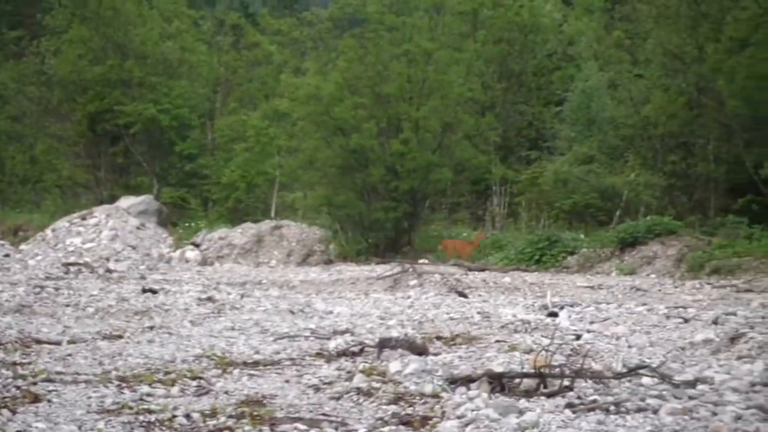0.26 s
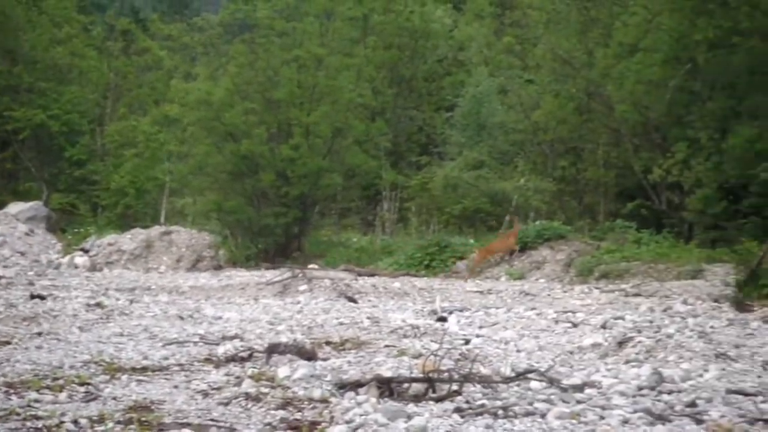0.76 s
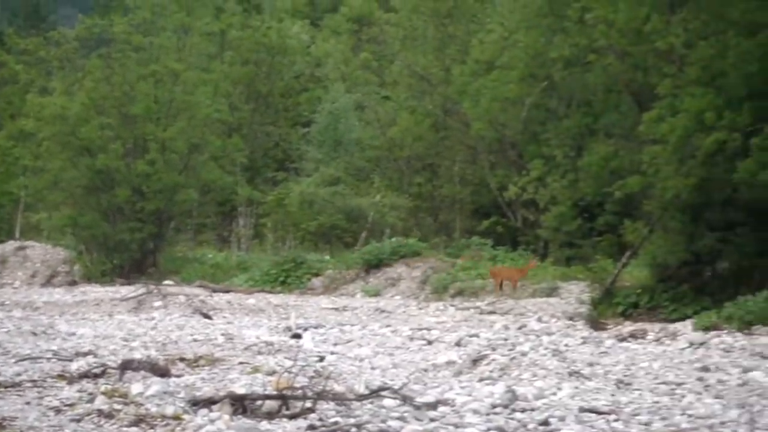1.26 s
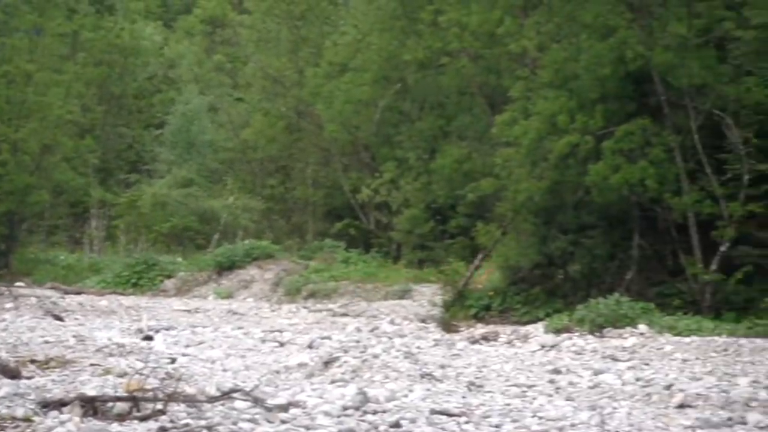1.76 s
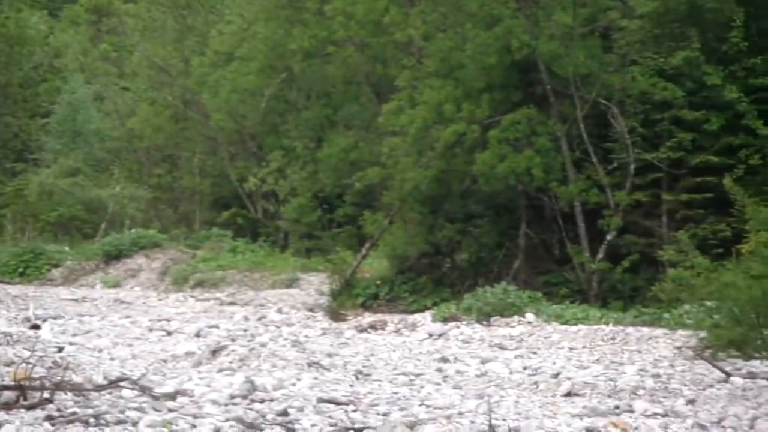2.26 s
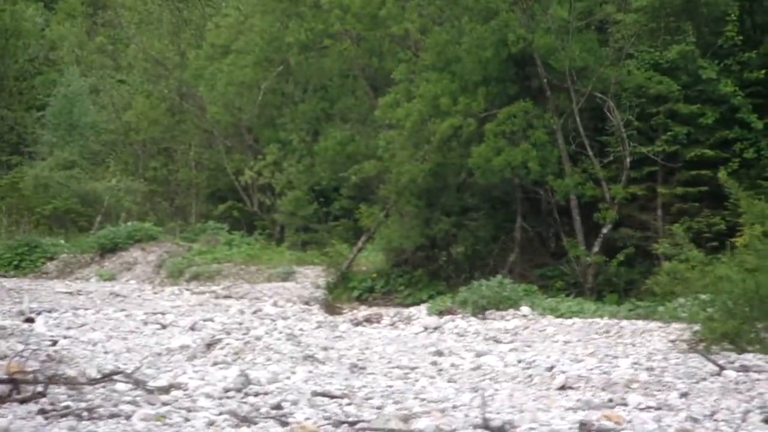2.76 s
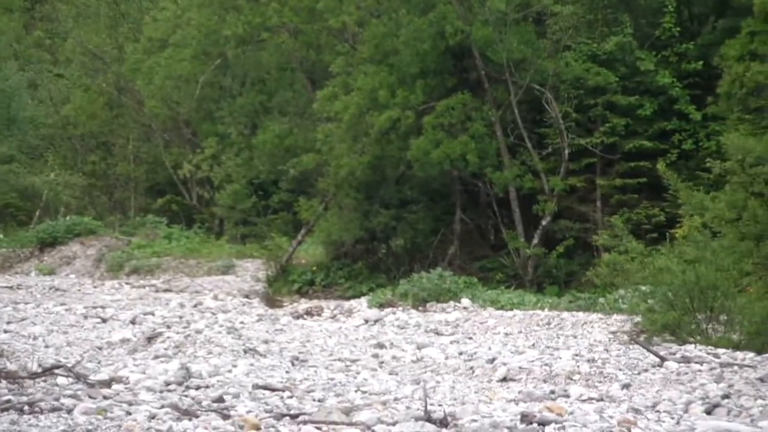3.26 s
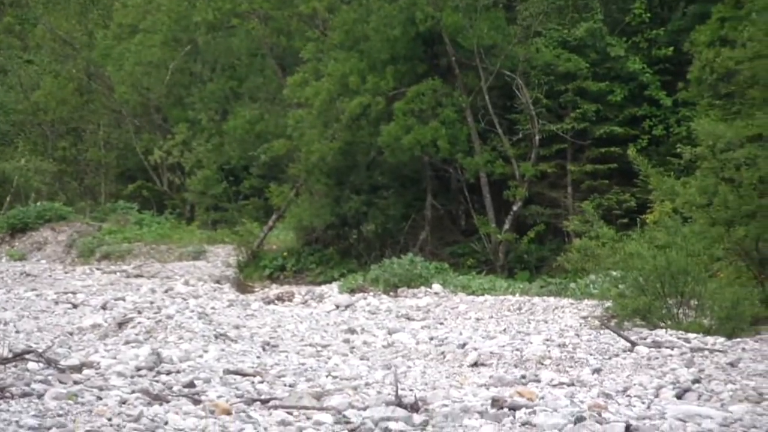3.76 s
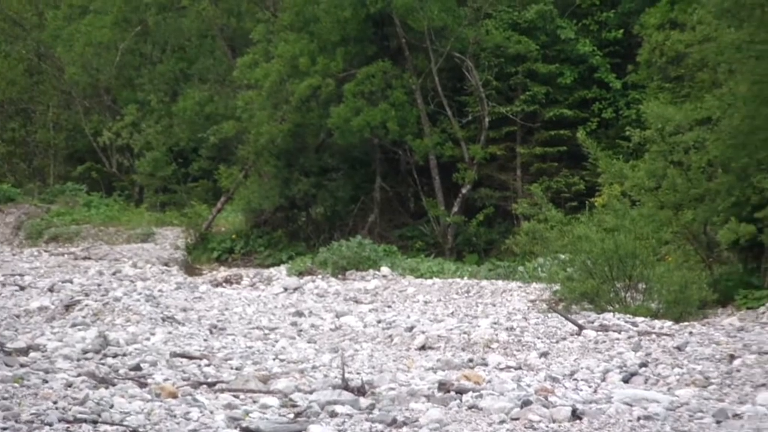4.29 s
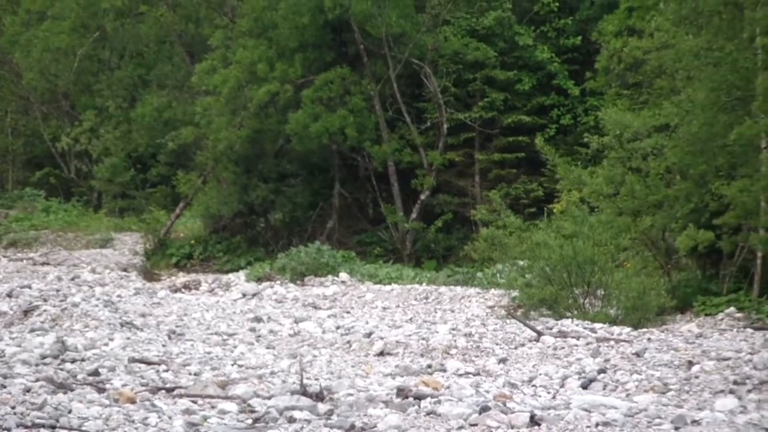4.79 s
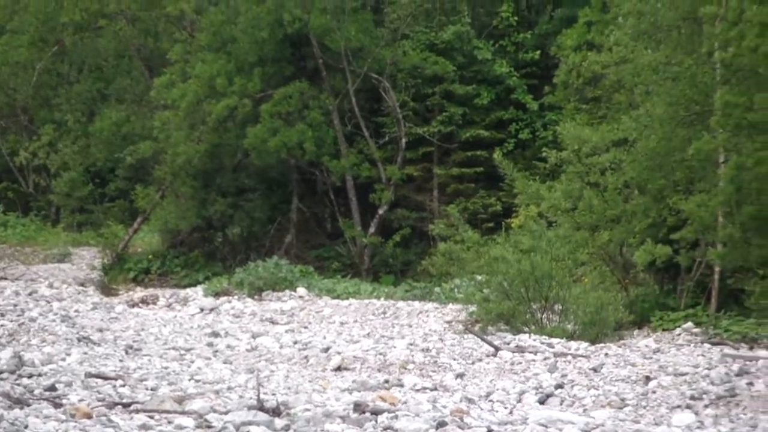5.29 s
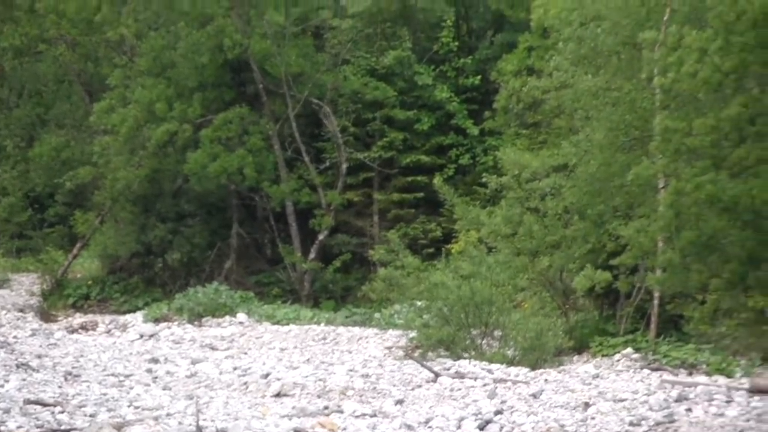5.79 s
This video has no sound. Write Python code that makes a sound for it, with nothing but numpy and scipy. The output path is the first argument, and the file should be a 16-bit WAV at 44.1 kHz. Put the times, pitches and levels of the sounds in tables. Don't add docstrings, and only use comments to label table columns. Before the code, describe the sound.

Gruff, spaced deer barks ring off trees and a far slope over faint water hiss, with whistled birdsong and sharp close plastic handling ticks.

```python
import sys
import numpy as np
from scipy import signal
from scipy.io import wavfile
from scipy.ndimage import uniform_filter1d

SR = 44100
rng = np.random.default_rng(int(sys.argv[2]) if len(sys.argv) > 2 else 0)


def file_out(sig):
    cols = np.atleast_2d(sig).T
    lim = np.clip(cols, -1, 1)
    pcm = np.round(lim * 32767).astype(np.int16)
    wavfile.write(sys.argv[1], SR, pcm)


def field_ratio(decibels):
    return 10 ** (np.asarray(decibels, dtype=float) / 20)


N = 266364


def evened(x):
    return x / np.sqrt(np.mean(x ** 2) + 1e-20)


def read(points, hz):
    f, value = np.transpose(points)
    return np.interp(np.log(hz + 1), np.log(f + 1), value)


def add(mix, s, sound):
    part = mix[..., round(s * SR):][..., :sound.shape[-1]]
    part += sound[..., :part.shape[-1]]


def panned(x, lean_db):
    return x * field_ratio([[lean_db / 2], [-lean_db / 2]])


def lowpassed(x, order, hz):
    return signal.sosfilt(signal.butter(order, hz, fs=SR, output="sos"), x)


def resonate(x, hz, width):
    turn = np.exp(2j * np.pi * np.cumsum(hz * np.ones(len(x))) / SR)
    r = np.exp(-np.pi * width / SR)
    return 2 * (turn * signal.lfilter([1 - r], [1, -r], x / turn + 1e-18)).real


def scatter(x, rise_s, speed, same):
    # frequency in Hz, time to fall 60 dB in seconds.
    forest_decay = [(300, 1.34), (600, 4.6), (1300, 2.12), (2500, 1.82), (5000, 1.22)]
    taps = np.zeros((2, SR))
    at = np.arange(0, SR - 40, 20) + rng.integers(0, 20, (2, (SR - 21) // 20))
    np.put_along_axis(taps, at, rng.choice([-1., 1.], at.shape), 1)
    same = np.clip(same, 0, 1)
    taps[1] = same * taps[0] + np.sqrt(1 - same ** 2) * taps[1]
    hz, t, z = signal.stft(taps, SR, nperseg=256)
    fall_db = -60 * speed * t / read(forest_decay, hz)[:, None]
    tail = signal.istft(z * field_ratio(fall_db), SR, nperseg=256)[1]
    tail = tail * (1 - np.exp(-np.arange(tail.shape[1]) / SR / rise_s))
    return signal.fftconvolve(x[None], tail / np.linalg.norm(tail[0]), axes=1)[:, :N]


def wash():
    # frequency in Hz, level in dB per Hz.
    floor_colour = [(12, -2), (35, 0.5), (90, -3), (180, -7.5), (360, -10.5), (700, -12.5), (1400, -15),
                    (2500, -15.5), (3300, -15.5), (4200, -18.5), (5500, -21), (9000, -23.5), (13500, -26),
                    (16000, -25.5)]
    # frequency in Hz, correlation from 0 to 1.
    likeness = [(60, 0.27), (180, 0.054), (550, 0.41), (1650, 0.29), (4970, 0.13), (15000, 0.099)]
    # frequency in Hz, left over right in dB.
    floor_lean = [(60, 0.76), (240, 3.1), (950, 2.1), (3770, 1.5), (15000, 0.66)]
    frames, hz = N // 256 + 5, np.fft.rfftfreq(1024, 1 / SR)
    a, b, c, d, patches = rng.standard_normal((frames, 513, 5)).T
    patches = uniform_filter1d(patches, size=12, axis=0)
    patches = evened(uniform_filter1d(patches, size=20, axis=1))
    same = np.clip(read(likeness, hz), -1, 1)[:, None]
    left = a + 1j * b
    right = same * left + np.sqrt(1 - same ** 2) * (c + 1j * d)
    z = np.array([left, right])
    z *= field_ratio(read(floor_colour, hz)[:, None] + 0.95 * patches)
    z *= field_ratio(np.array([[.5], [-.5]]) * read(floor_lean, hz))[..., None]
    return field_ratio(-54.5) * evened(signal.istft(z, nperseg=1024, noverlap=768)[1][:, :N])


def whine():
    # frequency in Hz, rms level in dB.
    line_tones = [(15550, -90), (15600, -85), (15650, -73), (15700, -87)]
    t = np.arange(N) / SR
    return sum(np.sqrt(2) * field_ratio(db) * np.sin(2 * np.pi * (hz * t + rng.random())) for hz, db in line_tones)


def bird():
    # start in seconds, length in seconds,
    # first pitch in Hz, last pitch in Hz.
    bird_notes = [(0.134, 0.039, 3460, 3450), (0.325, 0.051, 3270, 3000), (0.446, .099, 3200, 3830),
                  (0.595, 0.059, 2310, 3200), (0.678, 0.066, 3330, 3030), (.79, 0.057, 3260, 3670),
                  (1.088, .053, 3310, 3400), (1.26, 0.05, 3160, 3040), (1.689, 0.1, 2780, 2800),
                  (1.96, 0.033, 2614, 2540), (2.073, 0.021, 2520, 2560), (2.281, .037, 2420, 2580),
                  (2.315, 0.13, 2660, 2537), (2.414, 0.076, 3130, 2950), (2.49, 0.06, 2890, 2760),
                  (4.699, 0.039, 4170, 3970),
                  (2.611, .044, 4120, 3960), (2.645, 0.022, 3820, 3670), (2.676, 0.08, 4460, 4240),
                  (2.861, 0.033, 2530, 2300), (2.785, 0.07, 3230, 2850), (2.816, .04, 3720, 3200),
                  (2.942, 0.055, 2620, 2560), (3.061, 0.081, 2853, 2950), (3.161, 0.053, 3600, 3590),
                  (3.187, .039, 3890, 3800), (3.211, 0.04, 3480, 3180), (3.369, 0.084, 2400, 2620),
                  (3.5, 0.055, 3350, 3325), (3.62, 0.028, 4300, 4330), (3.629, 0.062, 3200, 2820),
                  (3.76, 0.063, 3580, 3740), (3.767, 0.067, 4740, 4350), (3.804, .027, 4300, 3940),
                  (3.815, 0.045, 3690, 3500), (3.863, 0.025, 3410, 3130), (3.966, 0.098, 3508, 3520),
                  (3.967, 0.03, 3150, 3100), (4.077, 0.075, 3800, 3620), (4.125, .07, 2210, 3510),
                  (4.188, 0.055, 3520, 3830), (4.254, .049, 2560, 2890), (4.295, 0.036, 3140, 3145),
                  (4.297, 0.092, 4260, 3780), (4.415, 0.044, 3140, 3215), (4.511, .055, 4120, 4100),
                  (1.215, 0.066, 4500, 4140), (2.133, 0.042, 5900, 5380), (2.696, 0.017, 5080, 4660),
              (3.074, 0.033, 5370, 6000)]
    # time in seconds, level in dB.
    effort = [(0, -66), (1.3, -64.5), (1.7, -58.5), (2.3, -61), (2.5, -57.5), (2.7, -54.5), (3.2, -56),
              (3.6, -54.5), (3.85, -56), (4.0, -53), (4.7, -57.5)]
    song, starts = np.zeros(N), rng.random(55)
    for (s, length, first_hz, last_hz), start in zip(bird_notes, starts):
        u = np.linspace(0, 1, round(length * SR))
        glide = u ** (0.763 if last_hz < first_hz else 1.3)
        hz = np.interp(glide, [.12, .92], [first_hz, last_hz])
        hz = uniform_filter1d(hz, len(u) // 4 + 1, mode="nearest")
        db = np.interp(s, *np.transpose(effort)) - 8 * abs(np.log2(hz.mean() / 3200))
        db -= 0.5 * np.log2(length / .05)
        turns = 45 * length * u + start
        hz = hz * (1 + .006 * np.cos(2 * np.pi * 0.59 * turns))
        quaver = field_ratio(3.1 * np.sin(2 * np.pi * turns))
        note = np.sin(2 * np.pi * np.cumsum(hz) / SR) * signal.windows.tukey(len(u), .5) * quaver
        add(song, s, np.sqrt(2) * field_ratio(db) * note)
    return panned(song, 1.5) + field_ratio(-6.0) * scatter(song, rise_s=.004, speed=3.5, same=.8)


def tick(centre_hz, spread, length):
    # frequency in Hz, time to fall 60 dB in seconds.
    casing_modes = [(800, 0.025), (1180, 0.012), (1450, 0.0066), (1810, 0.0065), (2160, 0.0081),
                    (2800, 0.013), (3440, 0.01), (4100, 0.004), (5200, 0.0032), (6600, 0.0014),
                    (7600, 0.0019), (9200, 0.015), (11200, 0.002), (14500, .004)]
    t = np.arange(800) / SR
    chance, size, crack = rng.random(300), rng.standard_normal(300), rng.standard_normal((2, 800))
    slips = (chance < .1) * size * .7 * np.exp(-(np.arange(len(size)) / SR / length) ** 2)
    slips[0] = 1.03
    snap = np.array([resonate(c, 1.2 * centre_hz, 0.94 * spread * centre_hz) for c in crack])
    snap = lowpassed(snap, 1, 7560)
    out = 1.1 * spread * evened(snap) * np.exp(-t / 0.00069)
    for hz, t60 in casing_modes:
        colour_db = -9 * abs(np.log2(hz / centre_hz) / spread) ** 1.9
        detune, port, start = rng.random(3)
        port_skew = np.array([[0], [1.9 * (port - .5)]]) * hz / 2500
        phase = 2 * np.pi * hz * (0.893 + 0.18 * detune) * t + port_skew
        out += field_ratio(colour_db - 60 * t / t60) * np.sin(phase + 1.2 * start) * (1 - np.exp(-t / 0.00014))
    out = signal.fftconvolve(out, slips[None], axes=1)
    return out / abs(out.mean(0)).max()


def knock():
    # frequency in Hz, level in dB, time to fall 60 dB in seconds.
    knock_modes = [(1200, 1.5, 0.025), (980, -17.5, 0.046), (1500, -8.5, 0.037), (1890, -14.5, 0.047),
                   (3380, -15, 0.034), (5220, -28.5, 0.014), (7800, -27, 0.012), (11100, -47, .008)]
    t = np.arange(2000) / SR
    ring = sum(field_ratio(db - 60 * t / t60) * np.sin(2 * np.pi * hz * t) for hz, db, t60 in knock_modes)
    blow = .58 + .7 * np.exp(-((t - .0013) / .0005) ** 2)
    grip = field_ratio(-10 * np.clip((t - .0032) / .0002, 0, 1))
    rattle = field_ratio(-30) * evened(resonate(rng.standard_normal(len(t)), 3200, 5000))
    rattle *= (t / 0.0013) * np.exp(-t / 0.002)
    shell = signal.butter(3, 580, "high", fs=SR, output="sos")
    sound = signal.sosfilt(shell, ring * blow * grip + rattle)
    return field_ratio(-8.6) * panned(sound / abs(sound).max(), 2.8)


def handling():
    # start in seconds, peak in dB, centre in Hz, spread in octaves.
    casing_ticks = [(1.0614, -37.5, 2600, 1.6), (2.913, -34, 1500, 0.63), (3.0859, -41, 2300, 0.89),
                    (3.11, -43, 5000, 1.3), (3.456, -28.5, 2900, 0.66), (.585, -48.5, 910, 0.86),
                    (2.3, -49, 2200, 0.45), (3.897, -41, 1800, 1.3), (3.695, -44.5, 3900, 0.37),
                    (3.946, -28, 1080, 0.16), (4.382, -41, 1200, 0.5), (5.1765, -39, 3520, 0.3),
                    (5.1986, -23, 1610, 0.23), (5.2792, -31, 1790, 0.81), (5.672, -37, 1500, 1),
                    (5.8071, -35, 1780, 0.84), (5.8425, -29.5, 3200, 0.8), (5.857, -25, 3630, 1.04),
                    (5.901, -25.5, 2000, 1.15), (5.9446, -37, 4500, 0.66), (6.033, -32, 2870, 0.85)]
    # start in seconds, peak in dB, fall in seconds, left over right in dB.
    thumps = [
        (1.663, -32.5, 0.0034, -28),
        (5.258, -26, 0.0041, 2),
    ]
    out, t = np.zeros((2, N)), np.arange(3000) / SR
    for s, db, centre_hz, spread in casing_ticks:
        length = 0.0031 * (1 if spread > .24 else .25)
        lean_db = 3.0 + 0.7 * np.log2(centre_hz / 2000) / max(spread, .4)
        add(out, s, field_ratio(db) * panned(tick(centre_hz, spread, length), lean_db))
    add(out, 5.25625, knock())
    for s, db, fall, lean_db in thumps:
        push = (1 - np.exp(-t / 0.00039)) * (np.exp(-t / fall) - 0.44 * np.exp(-t / 0.0087))
        add(out, s, field_ratio(db) * panned(push, lean_db))
    return out


def throat_at(mouth, effort_db):
    # frequency in Hz, power of the mouth factor that shifts it.
    throat_rest = [(488, 0.081), (1262, -0.24), (1985, -0.43), (2310, -1)]
    low_hz, second_hz, third_hz, fourth_hz = (hz * mouth ** power for hz, power in throat_rest)
    gape = 10 * (mouth - 1)
    low_db, upper_db = -1.5 - 2 * gape, 4 - 7.5 * gape
    low_db -= 0.47 * (effort_db + 53.5)
    return low_hz, low_db, second_hz, third_hz, upper_db, fourth_hz


def bark(length, mouth, throat, chest_db):
    throat_widths = [180, 151, 345, 315]
    t = np.arange(0, length + 0.036, 1 / SR)
    noise = rng.standard_normal((12000, 2))[:len(t)].T
    growl_hz = 66 * field_ratio(3.9 * evened(uniform_filter1d(noise[0], size=300)))
    turns = np.cumsum(growl_hz) / SR
    drive = (0.47 + np.exp(-(turns % 1) / 0.49)) * noise[1]
    u = t / length
    build = np.clip(u / (0.13 + 1.6 * abs(mouth - 1)), 0, 1)
    drive *= build ** 0.36 * np.clip((1 - u) / 0.43, 0, 1)
    late = drive * build ** 1.15
    opening = 1 + (mouth - 1) * np.sin(np.pi * np.clip(u, 0, 1))
    low_hz, low_db, second_hz, third_hz, upper_db, fourth_hz = throat
    modes = zip([drive, drive, late, late], [low_hz * opening ** 1.87, second_hz, third_hz, fourth_hz],
                [low_db, 0, upper_db - 0.5, upper_db - 6.0], throat_widths)
    loss = mouth ** 5.6
    voice = 0
    for x, hz, db, width in modes:
        once = resonate(x, hz * opening, loss * width)
        voice = voice + field_ratio(db) * evened(resonate(once, hz * opening, 1.15 * loss * width))
    hz, width = 1663, 1610
    breath = resonate(resonate(late, hz, width), hz, width)
    breath = field_ratio(-3.8) * evened(resonate(breath, hz, 0.68 * width))
    hz, width = 169, 68
    hum = resonate(resonate(drive, hz * (1.08 - 0.11 * u), width), hz, 4.3 * width)
    mouthed = lowpassed(evened(voice) + breath, 4, 2900)
    return mouthed + field_ratio(chest_db) * evened(hum)


def deer():
    # start in seconds, length in seconds, level in dB, echo from the slope in dB,
    # mouth opening at mid bark as a factor.
    barks = [
        (.014, 0.082, -58, -15.5, 0.97),
        (1.61, 0.1, -51, -17.5, 0.98),
        (2.504, 0.093, -52.5, -0.5, 1.025),
        (3.457, .12, -48.5, -7.5, 1.054),
        (4.549, 0.17, -49.5, -6.5, 1.118),
        (5.407, 0.11, -56.5, -10, 0.98),
        (5.922, 0.088, -51.5, -7.5, 1.04),
    ]
    straight, thrown, scattered = np.zeros((3, N))
    for s, length, db, echo_db, mouth in barks:
        chest_db = -8.5 - 2.5 * s
        sound = field_ratio(db) * bark(length, mouth, throat_at(mouth, db), chest_db)
        add(straight, s, sound)
        add(scattered, s, field_ratio(0.47 + 0.58 * echo_db) * sound)
        add(thrown, s + .326, field_ratio(echo_db) * sound)
    thrown = resonate(thrown, 1300, 1500)
    trees = field_ratio(3.0) * scatter(scattered + 0.79 * thrown, rise_s=0.01, speed=1.0, same=0.92)
    slope = field_ratio(0.7) * scatter(thrown + 0.3 * straight, rise_s=0.0019, speed=8.7, same=0.96)
    return panned(straight + 0.5 * thrown, 1.9) + panned(0.88, 1.8) * (trees + slope)


def scene():
    return deer() + bird() + handling() + wash()


def low_pass(x):
    return signal.sosfilt(signal.butter(12, 16610, fs=SR, output="sos"), x)


def record(dry):
    spaced = np.array([np.roll(dry[0], 1), dry[1]]) + panned(whine(), 2.3)
    band_limit = signal.firwin(1023, 15800, window=("kaiser", 9), fs=SR)
    limited = signal.oaconvolve(spaced, band_limit[None], "same")
    return low_pass(limited)


dry = scene()
out = record(dry)
file_out(out)
```